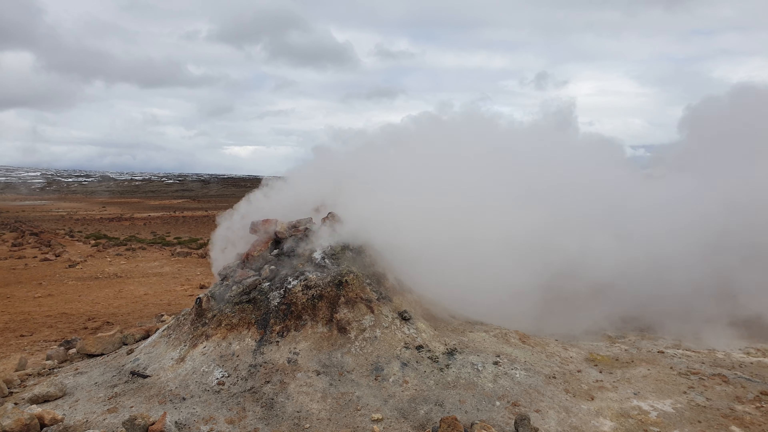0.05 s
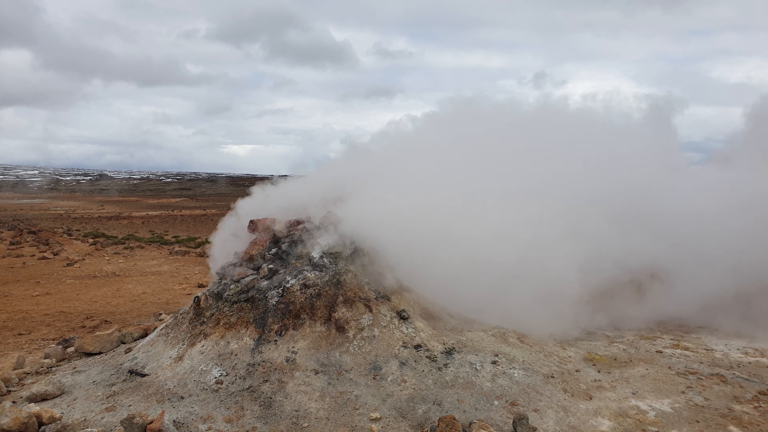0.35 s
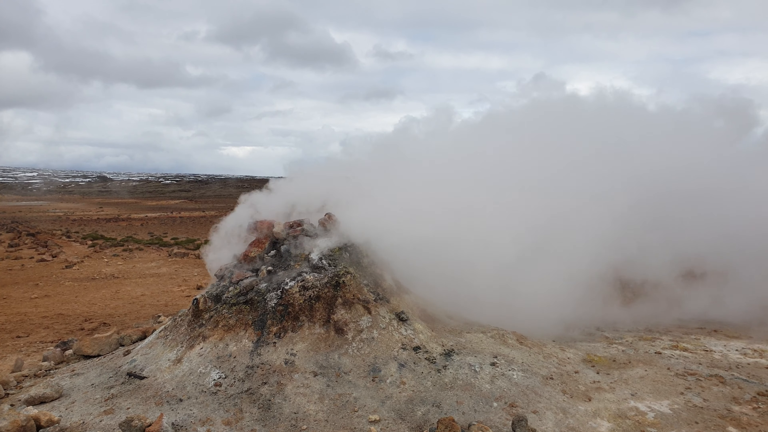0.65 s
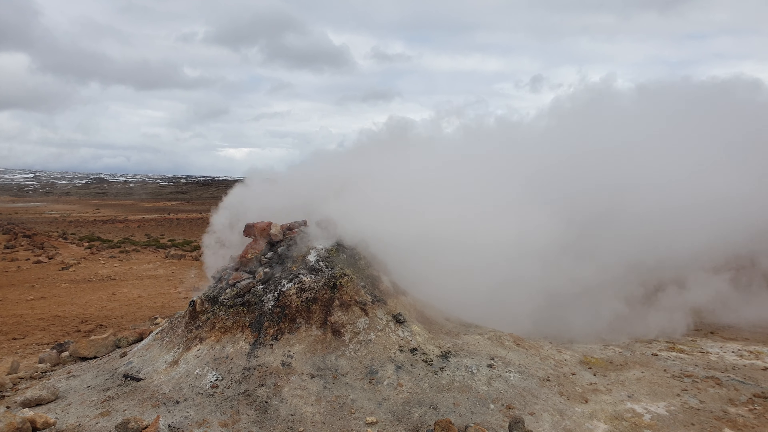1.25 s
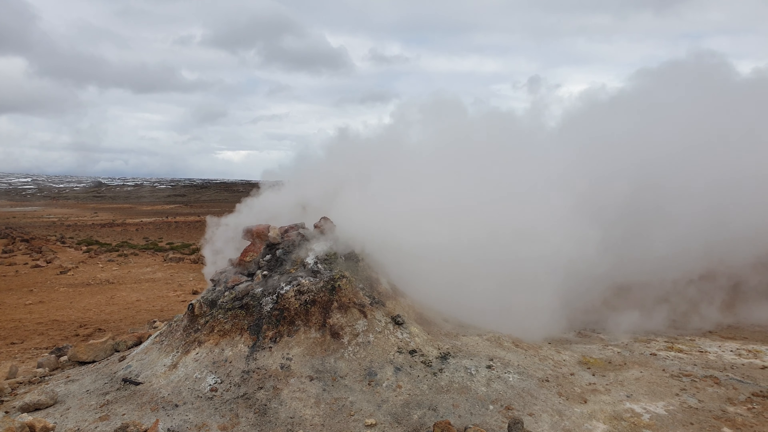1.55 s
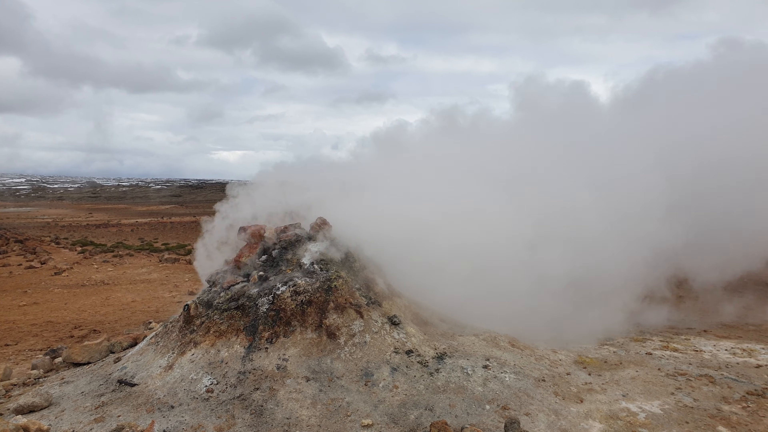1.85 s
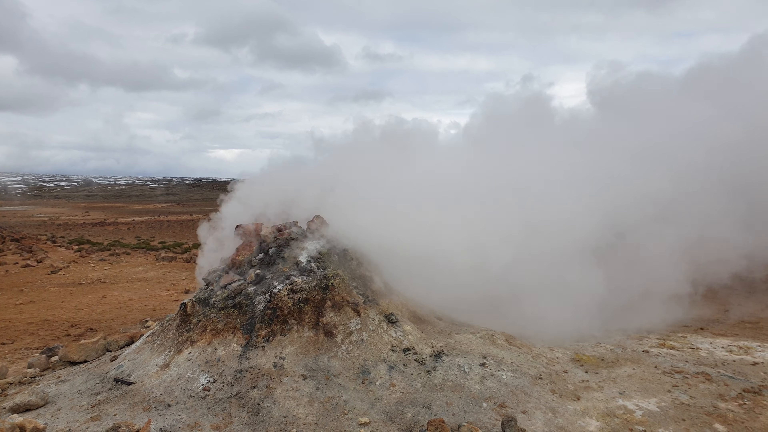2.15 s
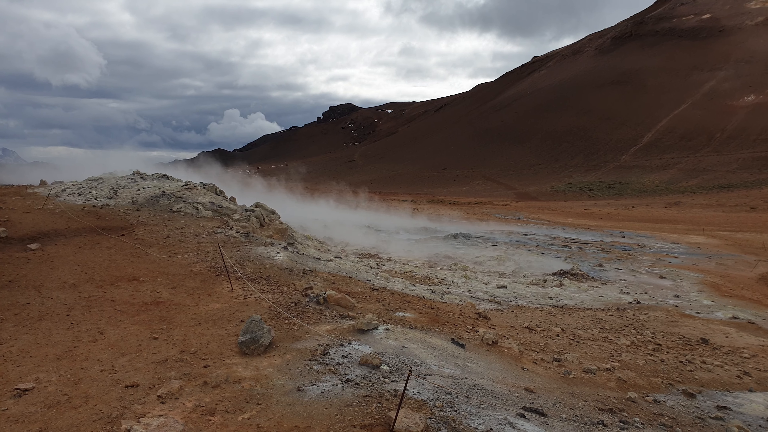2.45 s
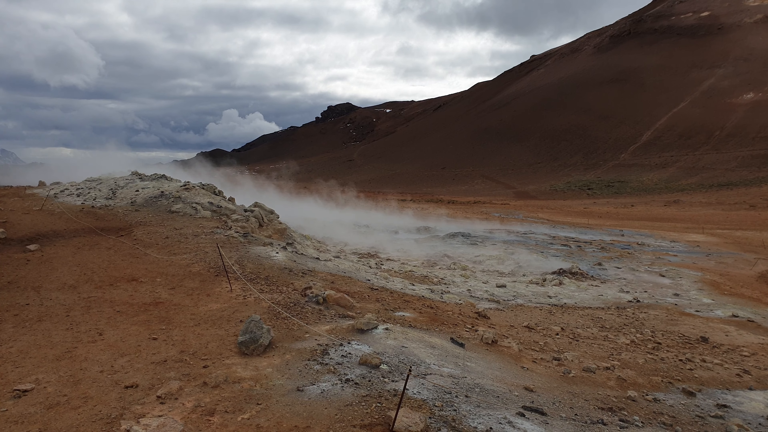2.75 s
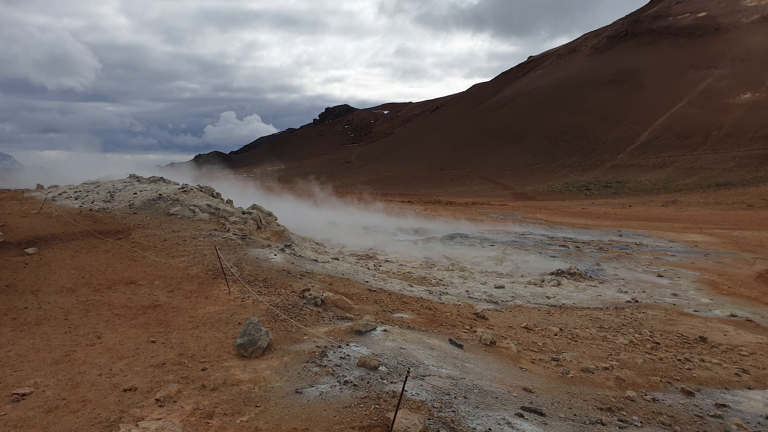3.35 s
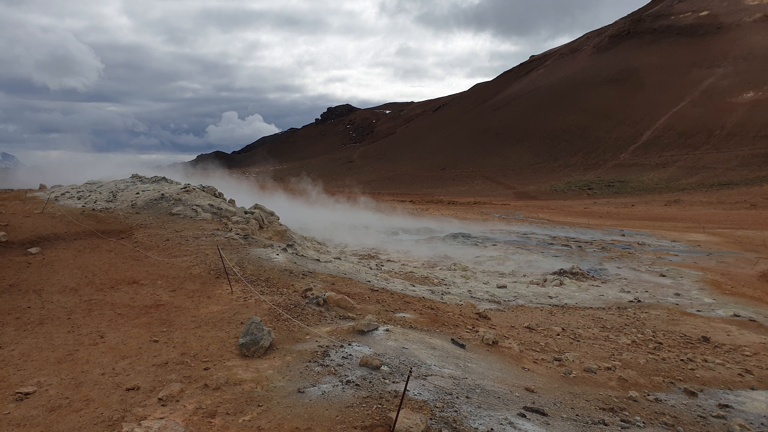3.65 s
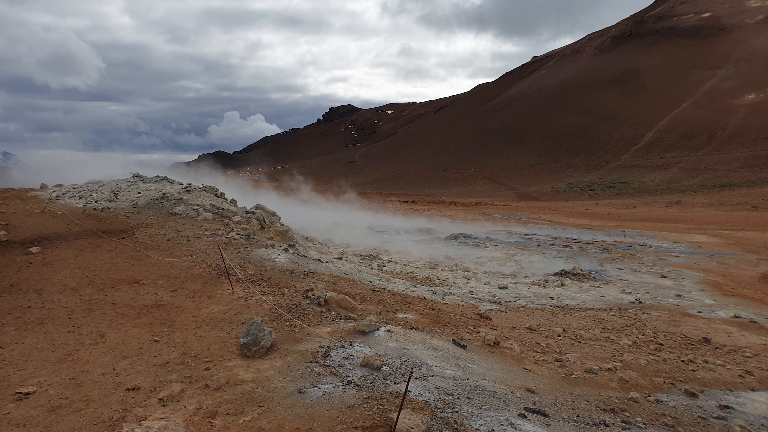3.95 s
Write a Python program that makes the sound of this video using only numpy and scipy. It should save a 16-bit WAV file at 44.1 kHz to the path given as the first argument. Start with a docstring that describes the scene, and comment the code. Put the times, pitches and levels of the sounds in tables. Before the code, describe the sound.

Steam hisses steadily from the ground while gusty wind rumbles and thumps on the microphone.

```python
"""Steam hisses from a rock vent on open ground, to the left of a small stereo microphone.
From the start, wind rumbles at the two microphone ports and flutters over the housing; soon big
eddies thump the ports and the air flaps now and then. At about 2.2 s the scene changes to the softer
hiss of a low steaming mound, also on the left. Just after 3 s the strongest gusts raise a roar."""
import sys
import numpy as np
from scipy import signal
from scipy.fft import rfft, irfft
from scipy.io import wavfile
from scipy.ndimage import uniform_filter1d

SR = 44100
rng = np.random.default_rng(int(sys.argv[2]) if len(sys.argv) > 2 else 0)


def inscribe(sig):
    """Save sig as 16-bit PCM at rate SR to the path in sys.argv[1].

    A 1-D sig is mono; a 2-D sig holds one channel per row.
    Samples are clipped to [-1, 1] before scaling.
    """
    pcm = np.round(np.clip(np.atleast_2d(sig).T, -1, 1) * 32767)
    wavfile.write(sys.argv[1], SR, pcm.astype(np.int16))


N = 176400
TIME_S, FREQ_HZ = np.arange(N) / SR, np.fft.rfftfreq(N, 1 / SR)


def undb(db):
    """Amplitude grows tenfold every 20 dB."""
    return 10 ** (np.asarray(db) / 20)


def over_time(table):
    """Linear interpolation of each column over time."""
    times, *columns = np.transpose(table)
    return np.array([np.interp(TIME_S, times, column) for column in columns])


def over_pitch(table):
    """Linear interpolation of each column over log frequency."""
    pitches, *columns = np.transpose(table)
    log_hz = np.log(np.maximum(FREQ_HZ, 1))
    return np.array([np.interp(log_hz, np.log(pitches), column) for column in columns])


def unit(x):
    """Normalisation to rms 1."""
    return x / np.sqrt(np.mean(x ** 2))


def colour(x, spectrum):
    """Filtering multiplies spectra; the result has rms 1."""
    return unit(irfft(rfft(x) * undb(over_pitch(spectrum)), N))


def even(x, span_s):
    """Division by the running rms holds a noise at steady strength."""
    return x / np.sqrt(uniform_filter1d(x ** 2, int(span_s * SR) + 1, axis=-1) + 1e-9)


def swell(peak_s, width_s):
    """A Gaussian envelope; the width is two standard deviations."""
    return np.exp(-2 * ((TIME_S - peak_s) / width_s) ** 2)


def wander(rate_hz):
    """Band-limited noise drifts smoothly, with rms 1."""
    band = np.exp(-(FREQ_HZ / rate_hz) ** 2) * (FREQ_HZ > rate_hz / 10)
    return unit(irfft(rfft(rng.standard_normal(N)) * band, N))


def turbulence(rate_hz, shared_db, own_db):
    """Turbulence modulates amplitude, partly in step at the two ports."""
    shared = shared_db * wander(rate_hz)
    own = own_db * np.array([wander(rate_hz), wander(rate_hz)])
    return unit(undb(shared + own))


def eddies(spectrum, shared_power):
    """Partial coherence: the ports feel only part of an eddy's pressure alike."""
    shared = np.sqrt(shared_power) * rng.standard_normal(N)
    own = np.sqrt(1 - shared_power) * rng.standard_normal((2, N))
    return colour(shared + own, spectrum)


# Share of the hiss power that arrives directly: pitch_hz, vent_fraction, mound_fraction
DIRECT_SHARE = [(700, 0.12, 0), (1970, 0.64, 0.96), (4030, 0.92, 0.87), (6840, 0.9, 0.84),
                (7500, 0.46, 0.7), (12000, 0.4, .3)]
# Overlapping bands of the hiss: centre_hz
HISS_BANDS = [300, 1500, 2500, 4000, 6000, 8000]
# Envelope of the hiss below its top band: time_s, level_db
HISS_LEVEL = [(.1, -1.5), (.17, -0.5), (.52, 0.5), (.7, -1), (1.15, 1), (1.28, 0), (1.45, 0.2), (1.76, -3),
              (1.93, -0.6), (2.48, 1.5), (2.7, -.5), (3.12, -1.5), (3.25, 0.8), (3.47, -2.5), (3.61, .9),
              (4, -2)]
def steam_hiss(spectrum, direct_share):
    """Jet noise as a direct plus a diffuse field; unsteady flow modulates all but the top band."""
    left_db, right_db, lag_ms = over_pitch(spectrum)
    jet = rfft(rng.standard_normal(N))
    delayed = jet * np.exp(-2j * np.pi * FREQ_HZ * lag_ms / 1000)
    direct = np.sqrt(direct_share) * np.array([jet, delayed])
    diffuse = np.sqrt(1 - direct_share) * rfft(rng.standard_normal((2, N)))
    at_ports = (direct + diffuse) * undb([left_db, right_db])
    weights = [np.interp(FREQ_HZ, HISS_BANDS, pick) for pick in np.eye(len(HISS_BANDS))]
    *lower_bands, airy_top = [irfft(at_ports * weight, N) for weight in weights]
    sputter_db, surge_db = 1.4, 0.68
    sputtering = sum(band * undb(sputter_db * wander(rate_hz=45)) for band in lower_bands)
    surge = undb(over_time(HISS_LEVEL) + surge_db * wander(rate_hz=13))
    return unit(sputtering * surge + airy_top)


# Spectrum of the vent: pitch_hz, left_db, right_db, right_lag_ms
VENT_SPECTRUM = [(300, -0.5, 4, 0.15), (555, 6, 10, 0.22), (750, 13, 14.5, 0.19), (1170, 8.5, 8.5, 0.3),
                 (1530, 5, 9, 0.16), (1877, 6, 2.5, 0.32), (2036, 7, 9, 0.44), (2450, 1.5, 2, .27),
                 (2790, 5.5, 7, 0.46), (3030, -7.5, -7.5, 0.38), (3640, 2, 0, .36), (3950, -7, -5.5, 0.34),
                 (4150, 3, 4, 0.31), (5070, -2, 3, .34), (6280, -2.5, -2.5, 0.303), (7000, -9, -12, 0.305),
                 (7860, -16.5, -16, 0.24), (8400, -13, -17.5, 0.227), (9100, -11.5, -11, 0.274),
                 (11200, -15.5, -24.5, 0.24), (14900, -20, -45, .22)]
def vent():
    """A turbulent jet radiates broadband noise, which reaches the nearer, left port first."""
    return steam_hiss(VENT_SPECTRUM, over_pitch(DIRECT_SHARE)[0])


# Pressure spectrum of small eddies: pitch_hz, level_db
RUMBLE_SPECTRUM = [(15, -41), (30, -7), (55, -1), (120, -2.5), (200, -8), (500, -30), (2000, -94)]
# Envelope of the rumble: time_s, left_db, right_db
RUMBLE_LEVEL = [(0, 3.5, 2), (.25, 5, 0), (.65, 0, -0.5), (1.15, -4, -1), (1.45, -3.5, 5.5),
                (2.17, 4.5, -5.5), (2.26, -26, 2.5), (2.45, -12, 0.5), (2.9, -1, 2), (3.3, -0.5, 6.5),
                (3.7, 7.5, -6.5), (3.86, 2, -27), (4, 2.5, -35)]
# Lulls between eddies: centre_s
RUMBLE_LULLS = [.118, .305, .41, 1.699, 3.537]
def rumble():
    """Small eddies press on each port almost independently; the pressure drops away in lulls."""
    pressure = eddies(RUMBLE_SPECTRUM, shared_power=0.13)
    pressure *= turbulence(rate_hz=39, shared_db=2, own_db=4)
    lull_db = -19 * sum(swell(centre_s, width_s=0.015) for centre_s in RUMBLE_LULLS)
    return even(pressure, span_s=0.12) * undb(over_time(RUMBLE_LEVEL) + lull_db)


# Strength of the wind: time_s, level_db
GUST_LEVEL = [(0, -0.5), (.45, -2), (.55, 2.5), (.8, 0), (.92, 2.5), (1.2, -4), (1.44, 2), (1.72, -4),
              (2.13, -1.5), (2.53, -8), (2.75, -5), (3.05, 0), (3.21, 6), (3.26, 1.5), (3.36, 7.5),
              (3.44, 3), (3.49, -5.5), (3.7, -0.5), (3.85, -6), (4, -9)]
# Pressure spectrum of the flow over the housing: pitch_hz, level_db
FLUTTER_SPECTRUM = [(60, -23), (150, 2), (250, 5.5), (400, -1), (580, -3), (800, -1), (1100, -10),
                    (1600, -16), (8000, -64)]
def flutter():
    """Turbulent flow over the housing flutters in proportion to the wind's strength."""
    ragged = rng.standard_normal((2, N)) * turbulence(rate_hz=43, shared_db=3, own_db=2)
    return even(colour(ragged, FLUTTER_SPECTRUM), span_s=0.11) * undb(over_time(GUST_LEVEL))


# Pressure spectrum of big eddies: pitch_hz, level_db
BUFFET_SPECTRUM = [(15, -43), (35, -15), (70, -0.5), (135, -5), (250, -22), (2000, -72)]
# Strikes of big eddies: peak_s, width_s, left_db, right_db
BUFFET_STRIKES = [(.212, 0.018, 9.5, 7.5), (0.28, 0.017, 12, 11), (0.352, 0.041, 9, 8.5),
                  (0.521, 0.026, 9.5, 9.5), (0.641, 0.048, 5.5, 9), (0.73, 0.04, 7, 8),
                  (0.934, 0.03, 9, 13.5), (1.023, 0.023, -0.5, 10.5), (1.375, 0.032, -1.5, -12),
                  (1.741, 0.016, -12, 9), (1.787, 0.011, 2, 2), (2.111, 0.058, 8.5, 8.5),
                  (2.187, 0.0087, 12, 16.5), (2.354, 0.041, 14, 16), (2.454, 0.052, 5.5, 2),
                  (3.031, 0.015, 8.5, -3), (3.162, 0.035, 7, 8.5), (3.296, 0.0087, -3, 6),
                  (3.427, 0.035, 9, 9), (3.588, 0.03, -4, 3.5)]
def buffets():
    """A big eddy's pressure pulse thumps each port with its own strength."""
    envelope = sum(undb([[left_db], [right_db]]) * swell(peak_s, width_s)
                   for peak_s, width_s, left_db, right_db in BUFFET_STRIKES)
    return even(eddies(BUFFET_SPECTRUM, shared_power=0.39), span_s=0.0266) * envelope


# Pressure spectrum of a flap: pitch_hz, level_db
FLAP_SPECTRUM = [(40, -32), (120, -8.5), (250, 13), (700, -18.5), (3000, -21), (8000, -71)]
# Flaps of air: peak_s, level_db
FLAP_PULSES = [(0.534, 3.5), (0.814, -9), (1.902, -3.5), (2.838, -0.5), (2.88, 1.5), (2.965, -1),
               (3.304, -1.5)]
def flaps():
    """Air flapping over the housing makes short pressure transients."""
    envelope = sum(undb(level_db) * swell(peak_s, width_s=0.012) for peak_s, level_db in FLAP_PULSES)
    return even(eddies(FLAP_SPECTRUM, shared_power=0.39), span_s=0.0071) * envelope


# Spectrum of the mound: pitch_hz, left_db, right_db, right_lag_ms
MOUND_SPECTRUM = [(300, -7.5, -6, .2), (810, 7.5, 3, 0.068), (1330, 2, 1, 0.18), (1990, 4, 6, .25),
                  (2680, 1, 4, 0.34), (3060, 0.5, 0, 0.34), (4650, -3, 0, 0.32), (5100, -3.5, 2.5, .35),
                  (5720, -3.5, -5, 0.347), (6540, -7.5, -4, 0.378), (7300, -15.5, -30, 0.36),
                  (8400, -12.5, -17, 0.31), (9500, -13, -17, 0.367), (10700, -14.5, -31, 0.36),
                  (12100, -20.5, -38, .335), (15000, -16.5, -42, .33)]
def mound():
    """Escaping steam makes jet noise; the lows are diffuse, and arrival time places the rest left."""
    return steam_hiss(MOUND_SPECTRUM, over_pitch(DIRECT_SHARE)[1])


# Spectrum of the gusts' roar: pitch_hz, level_db
ROAR_SPECTRUM = [(150, -17), (420, 5), (1300, -22.5), (8000, -82)]
def roar():
    """A square law in wind strength lets this noise stand out only in the strongest gusts."""
    return eddies(ROAR_SPECTRUM, shared_power=0) * undb(over_time(GUST_LEVEL)) ** 2


def scene():
    """Superposition: wind throughout, over an equal-power crossfade from vent to mound."""
    change_s, fade_s = 2.194, 0.008
    moved = np.clip((TIME_S - change_s) / fade_s + 0.5, 0, 1)
    steam = np.sqrt(1 - moved) * undb(-40.5) * vent() + np.sqrt(moved) * undb(-44.5) * mound()
    port_wind = undb(-36.5) * rumble() + undb(-35.5) * buffets()
    gusts = undb(-38.5) * flutter() + undb(-49) * roar() + undb(-34) * flaps()
    return steam + port_wind + gusts


def record(dry):
    """Band limiting: a steep elliptic low-pass removes the highest treble."""
    cutoff_hz = 15800
    return signal.sosfilt(signal.ellip(10, 0.1, 80, cutoff_hz, fs=SR, output="sos"), dry)


dry = scene()
out = record(dry)
inscribe(out)
```